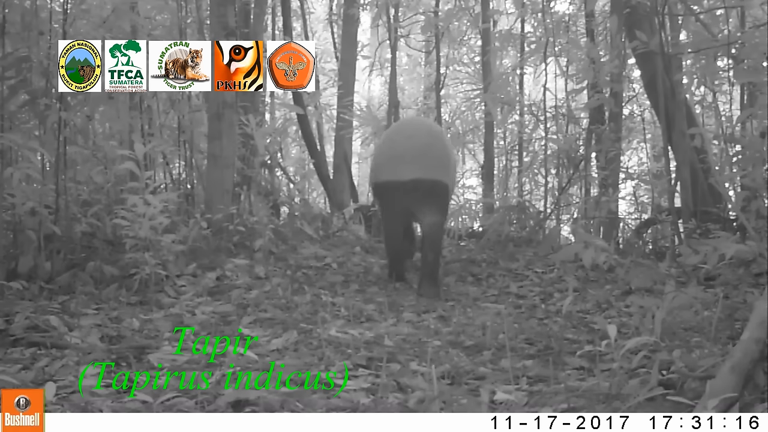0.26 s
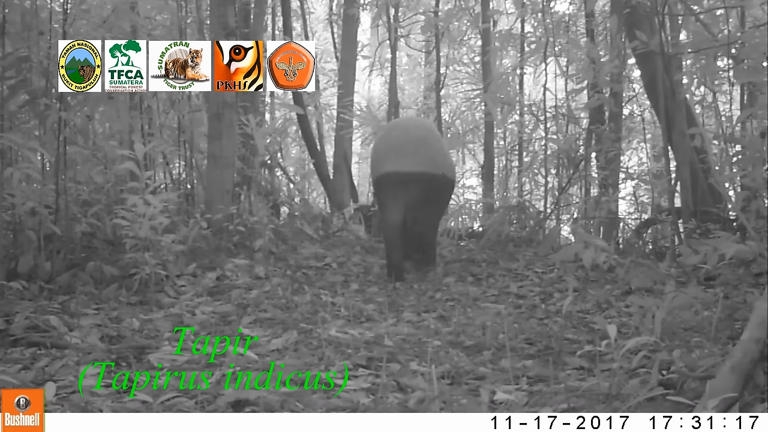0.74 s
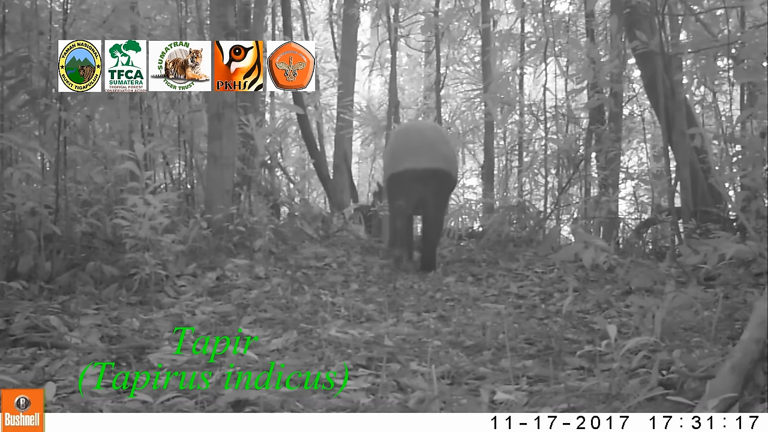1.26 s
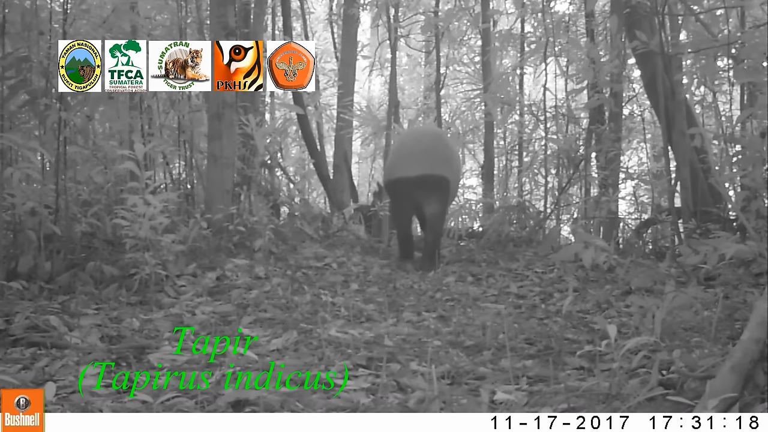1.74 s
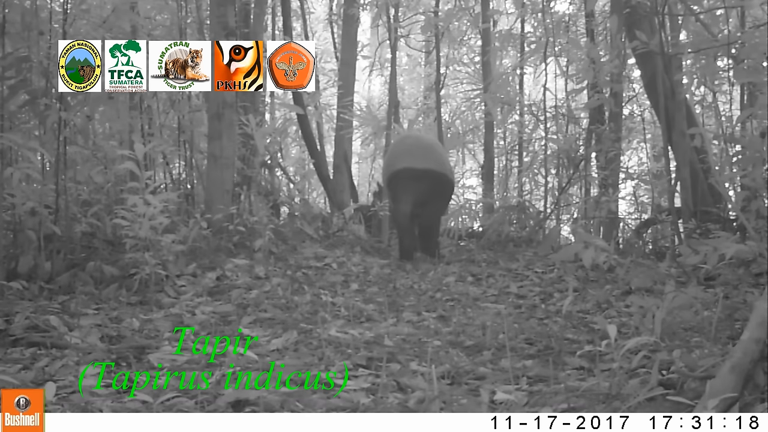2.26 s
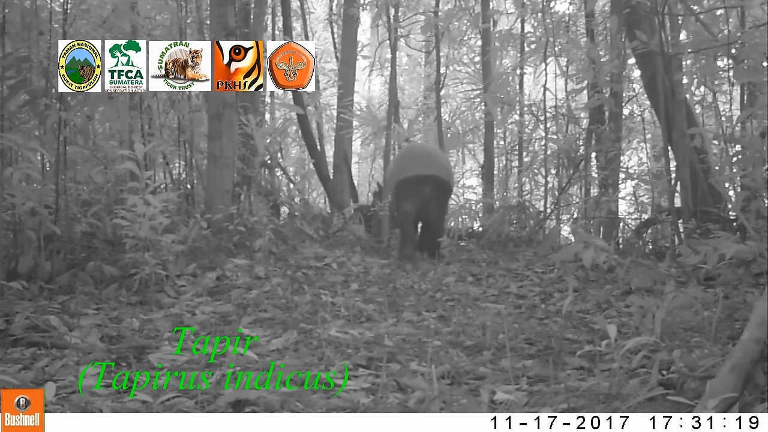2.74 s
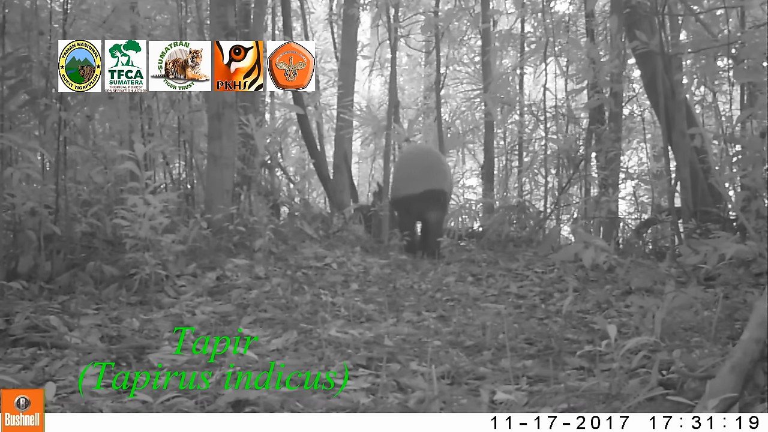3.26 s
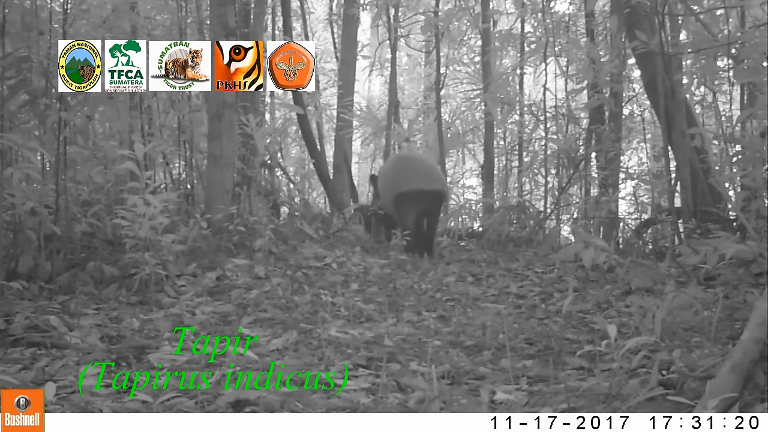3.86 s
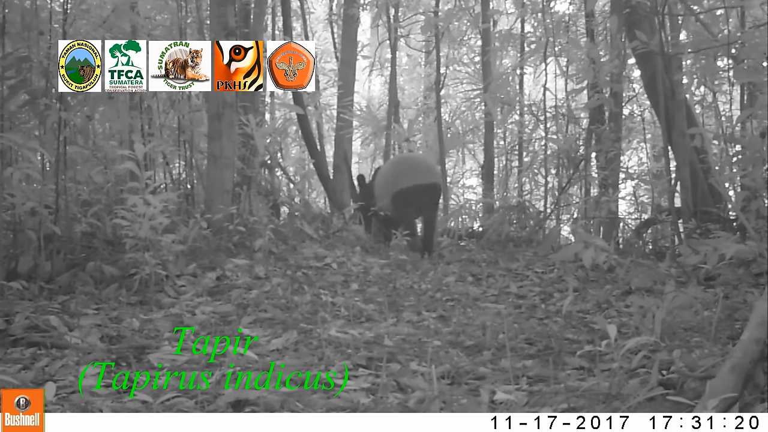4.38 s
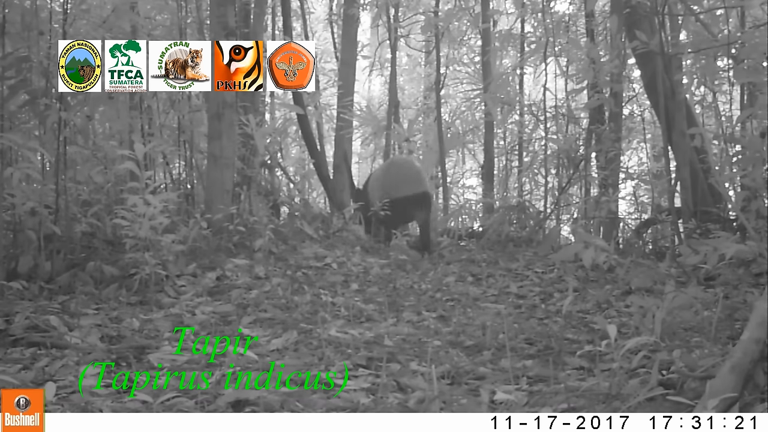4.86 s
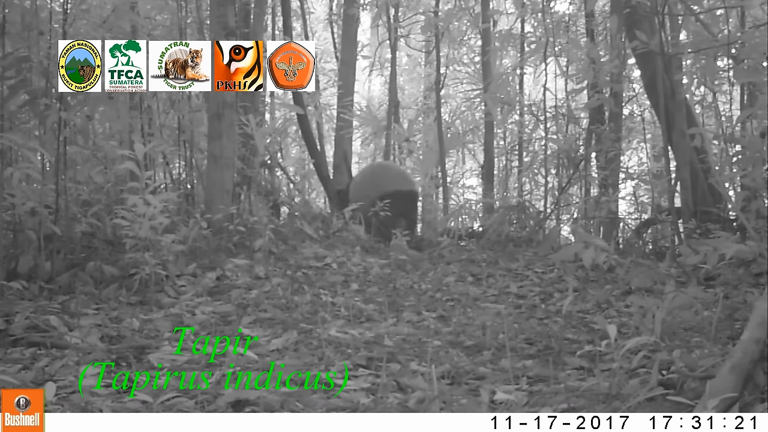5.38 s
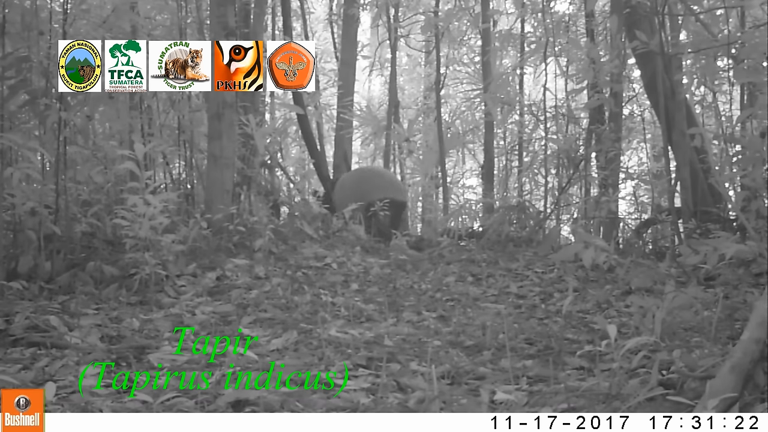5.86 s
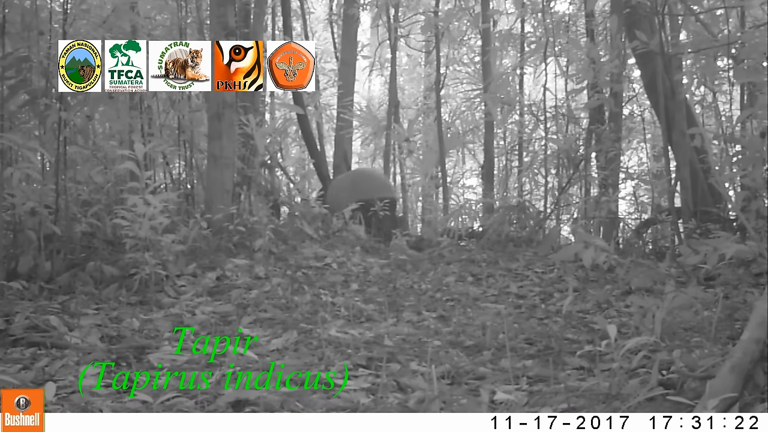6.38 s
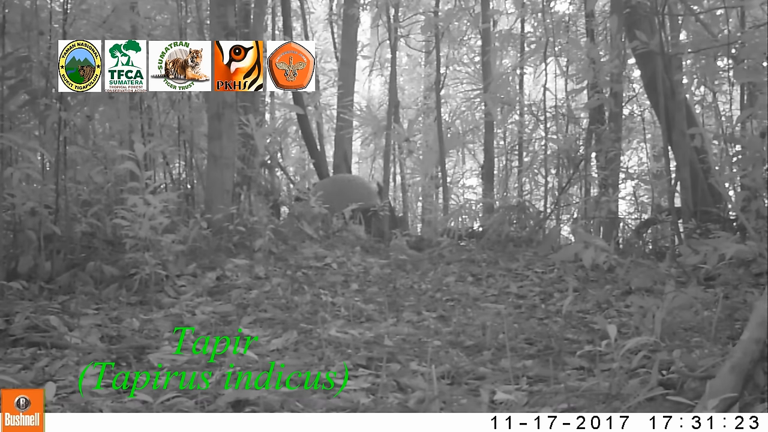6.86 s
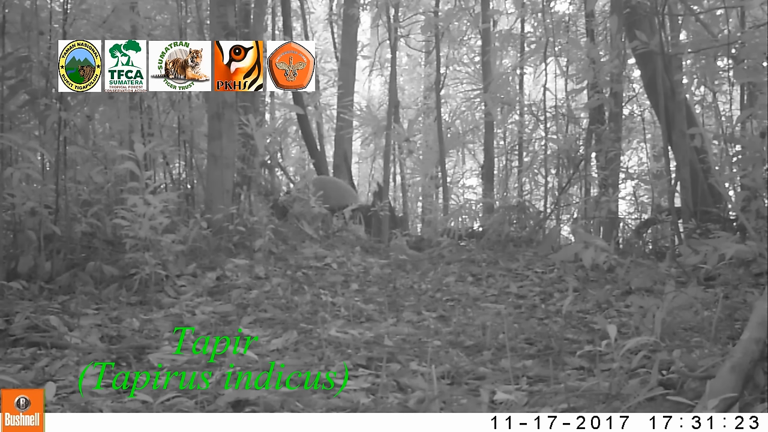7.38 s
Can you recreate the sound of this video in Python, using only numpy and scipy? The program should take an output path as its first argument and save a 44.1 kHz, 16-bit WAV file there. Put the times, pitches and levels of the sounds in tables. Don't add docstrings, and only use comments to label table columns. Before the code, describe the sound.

Low forest rumble and thin insect song, one early switch-on thump, brief dropouts, echoing downward bird whistles, and faint leaf rustling from an animal walking away.

```python
import sys
import numpy as np
from scipy import signal
from scipy.fft import rfft, irfft
from scipy.io import wavfile
from scipy.ndimage import uniform_filter1d

SR = 44100
rng = np.random.default_rng(int(sys.argv[2]) if len(sys.argv) > 2 else 0)


def invert_db(level):
    return 10 ** (np.asarray(level, dtype=float) / 20)


def store_wav(level_fs):
    pcm = np.round(np.clip(np.atleast_2d(level_fs), -1, 1) * 32767)
    wavfile.write(sys.argv[1], SR, pcm.T.astype(np.int16))


N = 336042


def evened(x):
    return x / np.sqrt(np.mean(x ** 2) + 1e-20)


def add(mix, start_s, sound):
    part = mix[round(start_s * SR):][:len(sound)]
    part += sound[:len(part)]


def coloured(x, points):
    curve_hz, curve_db = np.transpose(points)
    hz = np.fft.rfftfreq(len(x), 1 / SR)
    gain = invert_db(np.interp(np.log(hz + 1), np.log(curve_hz), curve_db))
    return evened(irfft(rfft(x) * gain, len(x)))


def fuzzy(pitch_hz, width_hz, size):
    r = np.exp(-np.pi * width_hz / SR)
    envelope = rng.standard_normal(size) + 1j * rng.standard_normal(size)
    envelope = signal.lfilter([1], [1, -2 * r, r * r], envelope)
    carrier = np.exp(2j * np.pi * pitch_hz * np.arange(size) / SR)
    return evened((envelope * carrier).real)


def echoes(x, t60, rise_s, wet_db, near_db=-33.0, near_t60=.2):
    t = np.arange(2 * SR) / SR
    hits = rng.random(len(t)) < 1 / 8
    taps = rng.standard_normal(len(t)) * hits * (1 - np.exp(-t / rise_s))
    far = taps * invert_db(-60 * t / t60)
    near = taps * invert_db(-60 * t / near_t60)
    tail = invert_db(wet_db) * far / np.linalg.norm(far) + invert_db(near_db) * near / np.linalg.norm(near)
    return x + signal.fftconvolve(x, tail)[:N]


def preamp_and_bands():
    # pitch_hz, density_db [dB per Hz]
    noise_curve = [(12, -20), (20, 7.5), (35, -5), (65, -6), (103, -9), (371, -18.5), (501, -22),
                   (864, -28), (1760, -35.5), (1960, -36.5), (2790, -37), (3670, -52.5), (4440, -40.5),
                   (5840, -43.5), (13600, -49.5)]
    # pitch_hz, width_hz, level_db
    bands = [(3600, 430, -72.5), (4120, 73, -77), (5660, 50, -87.5)]
    sound = invert_db(-50) * coloured(rng.standard_normal(N), noise_curve)
    for pitch_hz, width_hz, level_db in bands:
        sound = sound + invert_db(level_db) * fuzzy(pitch_hz, width_hz, N)
    return sound


def trill(length_s, first_hz, held_hz, level_db, climb, per_s, depth, sweep_hz):
    wander_hz = 22
    t = np.arange(0, length_s, 1 / SR)
    stroke = 2 * np.pi * per_s * t
    climbed = t / (climb * length_s)
    effort = evened(uniform_filter1d(rng.standard_normal(len(t)), size=900))
    hz = first_hz + (held_hz - first_hz) * np.minimum(climbed, 1) - sweep_hz * np.sin(stroke)
    hz = hz + wander_hz * effort
    swell = np.maximum(1 - depth * (1 + np.cos(stroke)), 0) * np.minimum(0.23 + climbed, 1)
    swell = swell * invert_db(2.5 * effort)
    tone = np.sin(2 * np.pi * np.cumsum(hz) / SR)
    return invert_db(level_db) * swell * tone * signal.windows.tukey(len(t), .14)


def crickets():
    # start_s, length_s, pitch_hz, width_hz, level_db
    singers = [
        (.98, .45, 5700, 120, -77),
        (0, .1, 5520, 220, -58),
        (0, .1, 5000, 500, -63),
        (.005, .03, 4600, 200, -62),
    ]
    # start_s, length_s, level_db
    trills = [
        (0.185, 0.3, -69),
        (1.045, .27, -71),
        (1.972, 0.24, -68.5),
        (2.93, 0.24, -68.5),
        (3.692, 0.23, -68.5),
        (4.535, 0.24, -68.5),
        (5.343, 0.25, -68),
        (6.107, .29, -68.5),
        (7.106, 0.22, -68),
    ]
    # start_s, length_s, first_hz, last_hz, level_db
    climbs = [
        (5.766, 0.18, 6270, 6750, -62),
        (6.816, .155, 6500, 6730, -59),
    ]
    far, near, thin = np.zeros((3, N))
    for start_s, length_s, pitch_hz, width_hz, level_db in singers:
        size = round(length_s * SR)
        tone = fuzzy(pitch_hz, width_hz, size)
        add(thin, start_s, invert_db(level_db) * tone * signal.windows.tukey(size, .1))
    for start_s, length_s, level_db in trills:
        add(far, start_s, trill(length_s, 6520, 6870, level_db, climb=.08, per_s=43, depth=.33, sweep_hz=50))
    for start_s, *row in climbs:
        add(near, start_s, trill(*row, climb=.9, per_s=42.5, depth=2.2, sweep_hz=150))
    far = echoes(far, t60=1.1, rise_s=.002, wet_db=1., near_db=3, near_t60=.15)
    near = echoes(invert_db(2.0) * near, t60=0.24, rise_s=0.0029, wet_db=-5)
    return far + near + thin


def dropout_gain():
    # cut_s, back_s, cut_gain [0-1], gain just before coming back [0-1]
    dropouts = [
        (.099, .135, 0, .45),
        (1.0986, 1.299, 0, 0),
        (1.47, 1.479, .1, .2),
    ]
    cut_s, return_s = .0005, .0035
    points = []
    for start_s, back_s, low, late in dropouts:
        points += [(start_s - cut_s, 1), (start_s, low)]
        points += [(back_s - return_s / 2, late), (back_s + return_s / 2, 1)]
    return np.interp(np.arange(N) / SR, *np.transpose(points))


def switch_on():
    t = np.arange(SR // 2) / SR
    step = 1 / (1 + np.exp(-(t - .00033) / .00001))
    discharge = (1.15 * np.exp(-t / .034) - .15 * np.exp(-t / .15)) * step
    ring = np.cos(2 * np.pi * 5200 * (t - .00038)) * np.exp(-((t - .00036) / .00008) ** 2)
    bounce = -.17 * np.roll(ring, 68)
    sputter = invert_db(-37 - 60 * t / .15) * rng.standard_normal(len(t))
    return invert_db(-21.7) * (discharge + .5 * ring + bounce + sputter)


def contour(kind, start_s, length_s, high_hz, low_hz, level_db):
    easy_hz, strain_db_per_khz = 4200, -28.5
    held, sliding, scoop_hz, swell_db, fade_db = kind
    u = np.linspace(0, 1, num=40)
    down = np.sin(np.pi / 2 * np.clip((u - held) / sliding, 0, 1)) ** 2
    onset = np.exp(-u / 0.1336)
    hz = high_hz + (low_hz - high_hz) * (down - down[0]) / (1 - down[0]) - scoop_hz * onset
    strain_db = strain_db_per_khz * np.maximum(hz - easy_hz, 0) / 1000
    db = level_db + swell_db * onset + fade_db * u ** 2 + strain_db
    return np.transpose([start_s + length_s * u, hz, db])


def whistle(notes, wobble_hz):
    out = np.zeros(N)
    quaver_hz = wobble_hz * evened(uniform_filter1d(rng.standard_normal(N), size=300))
    for rows in notes:
        s, hz, db = np.transpose(rows)
        t = np.arange(s[0], s[-1], 1 / SR)
        pitch_hz = np.interp(t, s, hz) + quaver_hz[round(s[0] * SR):][:len(t)]
        tone = np.sin(2 * np.pi * np.cumsum(pitch_hz) / SR)
        add(out, s[0], invert_db(np.interp(t, s, db)) * tone * signal.windows.tukey(len(t), .12))
    return out


def bird():
    plunge = -0.4, 1.5, 4, -0.5, -22
    hook = .62, .5, 0, -1, -15
    arch = .4, .45, 170, -5, -5
    slide = -0.07, 0.76, 3, -4, -15.5
    level = 0.15, 0.66, 73, -2, -4
    # start_s, length_s, high_hz, low_hz, level_db
    plunges = [
        (0.531, 0.057, 4530, 2900, -43.5),
        (2.704, 0.054, 4630, 2805, -43),
        (7.505, .075, 4084, 2905, -41.5),
    ]
    hooks = [
        (.947, .055, 3660, 2750, -40),
        (3.147, .043, 3720, 2800, -36.5),
    ]
    arches = [
        (.625, .15, 3690, 3378, -41.5),
        (2.795, .18, 3754, 3332, -41),
    ]
    slides = [
        (1.015, .17, 3613, 3150, -44),
        (3.22, 0.17, 3600, 3140, -42.5),
        (4.786, 0.15, 4564, 4002, -42),
        (5.23, 0.118, 4210, 4100, -45.5),
        (5.185, 0.061, 4200, 4190, -55),
        (5.45, 0.16, 3724, 3263, -40),
        (7.011, 0.109, 4575, 4360, -44),
        (7.185, 0.032, 4350, 4200, -49),
        (7.24, 0.12, 4324, 3918, -42),
        (7.575, .035, 3730, 3500, -41.5),
    ]
    levels = [
        (0.889, 0.045, 3800, 3790, -53),
        (3.07, 0.087, 3715, 3830, -51.5),
    ]
    soft_levels = [
        (0.501, 0.05, 4520, 4500, -61),
        (2.675, 0.061, 4640, 4700, -56),
        (4.756, .035, 4760, 4700, -64),
        (5.08, 0.074, 4500, 4490, -59),
        (5.13, 0.037, 3260, 3150, -63),
        (5.203, 0.04, 3230, 3180, -68),
        (5.377, 0.042, 3200, 2980, -64.5),
    ]
    kinds = (plunge, plunges), (hook, hooks), (arch, arches), (slide, slides), (level, levels)
    song_notes = [contour(kind, *row) for kind, rows in kinds for row in rows]
    song = invert_db(-13.5) * whistle(song_notes, wobble_hz=27)
    soft = invert_db(0.5) * whistle([contour(level, *row) for row in soft_levels], wobble_hz=22.2)
    song = echoes(song, t60=1.25, rise_s=.002, wet_db=9.5, near_db=11, near_t60=.36)
    return song + echoes(soft, t60=1.1, rise_s=.002, wet_db=-1, near_db=3, near_t60=.15)


def scuffing():
    # peak_s, swell_s, fade_s, level_db
    scuffs = [(.64, 0.15, 0.079, -68), (.74, .018, 0.042, -60), (.86, 0.093, 0.24, -60.5),
              (1.43, 0.055, .06, -70.5), (1.51, .025, 0.097, -63), (1.73, .06, .12, -74.5),
              (1.84, 0.22, 0.026, -68), (2.38, 0.33, 0.038, -71), (2.6, 0.28, 0.032, -73.5),
              (2.96, 0.45, 0.11, -68), (3.29, 0.35, .12, -69), (3.76, 0.069, 0.034, -69.5),
              (4.05, .15, 0.11, -62), (4.55, 0.081, 0.12, -67), (4.81, .25, 0.12, -66.5),
              (5.28, .06, 0.17, -72), (5.54, 0.23, 0.45, -67.5), (6.15, 0.034, .3, -66.5),
              (6.43, 0.043, 0.089, -66), (6.59, 0.13, 0.079, -63.5), (6.88, 0.34, 0.3, -68.5),
              (7.065, 0.12, .15, -58.5), (7.28, 0.096, .1, -70), (7.58, .1, .1, -70)]
    span_db = 15
    t = np.arange(0, N + 64, 64) / SR
    power = 0
    for peak_s, swell_s, fade_s, level_db in scuffs:
        away = np.maximum((peak_s - t) / swell_s, (t - peak_s) / fade_s)
        power = power + invert_db(level_db - span_db * away) ** 2
    return np.interp(np.arange(N) / SR, t, np.sqrt(power))


def leaves():
    # pitch_hz, density_db [dB per Hz]
    box_curve = [(900, -32), (1800, -8.5), (2600, -13), (3200, 5), (3800, 6.5), (4500, -2), (5500, -7.5),
                 (7500, -21), (10500, -12.5), (13000, -14), (14500, -30)]
    # start_s, peak_db
    twigs = [(1.492, -32.5), (1.719, -36.5), (1.795, -43.5), (2.2019, -42.5), (2.368, -42), (4.0532, -48),
             (4.7547, -42), (6.1435, -35.5), (6.3974, -44), (6.4207, -37), (6.493, -39), (6.919, -37.5)]
    struck = rng.random(N) < 2500 / SR
    cracks = rng.standard_normal(N) * invert_db(1.8 * np.minimum(rng.exponential(1, N), 5)) * struck
    mix = evened(cracks) * scuffing() * invert_db(5.5)
    t = np.arange(1500) / SR
    for start_s, peak_db in twigs:
        burst = uniform_filter1d(rng.standard_normal(len(t)), size=2)
        add(mix, start_s, invert_db(peak_db - 9.5 - 60 * t / 0.043) * burst * np.minimum(t / 0.0048, 1))
    rms = np.sqrt(np.mean(mix ** 2))
    return echoes(rms * coloured(mix, box_curve), t60=0.45, rise_s=.003, wet_db=-2.5)


def thinned(x):
    hz, t, z = signal.stft(x, SR, nperseg=2048, noverlap=1024)
    smooth = uniform_filter1d(abs(z) ** 2, size=31, axis=0)
    usual = np.sqrt(uniform_filter1d(smooth, size=5, axis=1) + 1e-30)
    mood_db = 2.0 * np.repeat(rng.standard_normal((len(hz) // 24 + 1, len(t))), 24, axis=0)[:len(hz)]
    threshold_db = np.interp(hz, [5000, 8000, 11000, 13800], [-40, -7, -3, 1])[:, None] + mood_db
    kept = abs(z) > usual * invert_db(threshold_db)
    return signal.istft(z * kept, SR, nperseg=2048, noverlap=1024)[1][:N]


def treble_patches(treble):
    hz, t, z = signal.stft(treble, SR, nperseg=2048, noverlap=1024)
    busy = np.interp(t, np.arange(N) / SR, scuffing()) / invert_db(-70)
    kept = rng.random((len(hz) // 24 + 1, len(t))) < .22 * np.minimum(busy + .15, 3)
    z = z * np.repeat(kept, 24, axis=0)[:len(hz)]
    return invert_db(-9) * signal.istft(z, SR, nperseg=2048, noverlap=1024)[1][:N]


def scene():
    return (preamp_and_bands() + crickets() + bird() + leaves())[None]


def low_pass(x):
    return signal.sosfilt(signal.butter(12, 15720, fs=SR, output="sos"), x)


def record(dry):
    out = dry[0].copy()
    size = round(.2 * SR)
    early, lost = round(.2985 * SR), round(1.0985 * SR)
    blend = np.minimum(np.minimum(np.arange(size, 0, -1) / 200, np.arange(size) / 12), 1)
    out[early:early + size] += blend * (dry[0, lost:lost + size] - dry[0, early:early + size])
    out = thinned(out) * dropout_gain()
    add(out, .13549, switch_on())
    lowpass = signal.firwin(401, 13750, fs=SR, window=("kaiser", 7))
    low = signal.oaconvolve(out, lowpass, "same")
    out = low + treble_patches(out - low)
    return low_pass(out[None])


dry = scene()
out = record(dry)
store_wav(out)
```